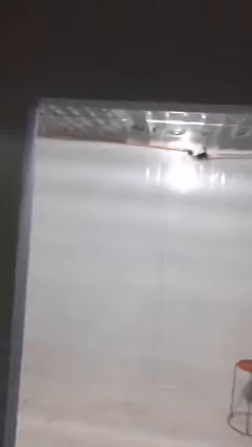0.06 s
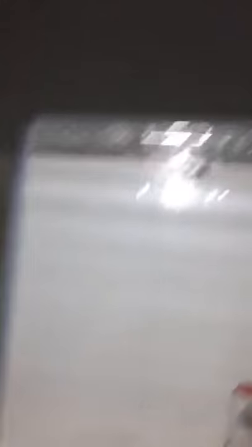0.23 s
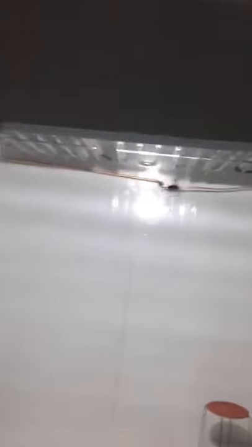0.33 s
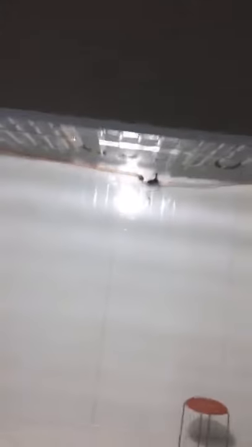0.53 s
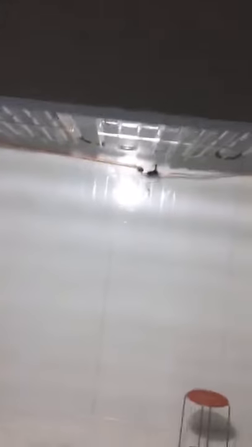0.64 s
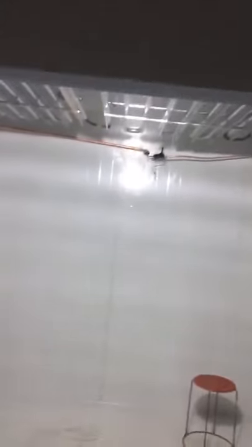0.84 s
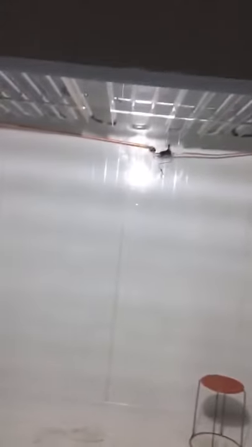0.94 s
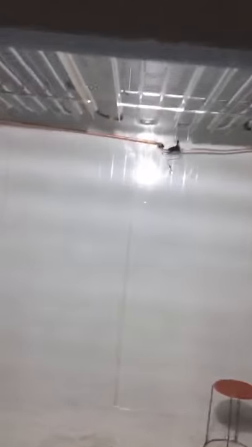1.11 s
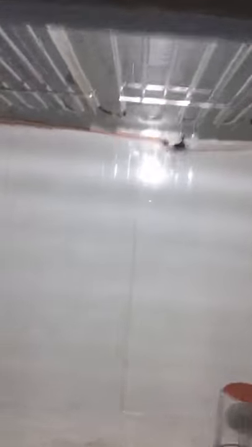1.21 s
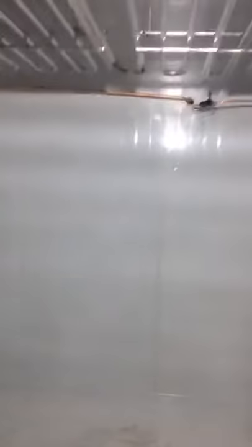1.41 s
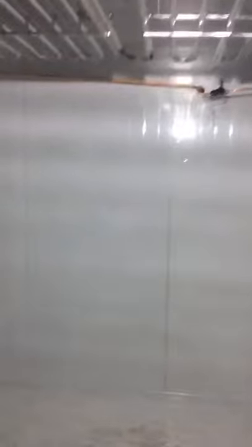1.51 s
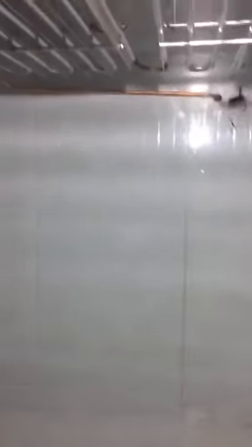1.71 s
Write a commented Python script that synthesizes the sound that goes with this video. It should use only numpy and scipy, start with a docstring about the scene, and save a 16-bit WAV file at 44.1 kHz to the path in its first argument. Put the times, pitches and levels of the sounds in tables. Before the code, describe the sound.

A metal door latch clunks sharply in a bare room, then someone steps inside.

```python
"""Stepping into a cold store

A door's latch scrapes and snaps over in a quick run of metal contacts; the bare room rings with it.
Someone steps inside: light taps, then a hollow heel-and-toe clomp on a floor panel.
Clothes rustle near the microphone over the low drone of distant machinery."""
import sys
import numpy as np
from scipy import signal
from scipy.fft import rfft, irfft, next_fast_len
from scipy.io import wavfile
from scipy.ndimage import map_coordinates

SR = 44100
rng = np.random.default_rng(int(sys.argv[2]) if len(sys.argv) > 2 else 0)


def waveform_to_disk(signal):
    """Save audio, clipped to [-1, 1], as 16-bit WAV at the path in sys.argv[1]."""
    frames = np.transpose(np.atleast_2d(signal))
    scaled = np.clip(frames, -1, 1) * 32767
    samples = np.round(scaled).astype(np.int16)
    wavfile.write(sys.argv[1], SR, samples)


N = 77175

# the bolt's metal contacts: t/s, level/dB, brightness/(dB per octave)
LATCH_CONTACTS = [(.2061, -5.5, -2.5), (.2070, -3.5, -2), (0.2104, -3.5, -2.5), (0.2185, -4, 2),
                  (.2194, -10, 0.5), (0.2203, -.5, -3), (.2230, -2.5, 0), (.2243, -6.5, -3),
                  (0.2272, -15, 1), (0.2298, -7.5, -0.5), (.2320, -12, -2), (.2420, -19, -7.5)]
# tone of the latch's scrape and contacts: f/Hz, level/dB
LATCH_TONE = [(40, -62), (100, -34), (250, -21.5), (600, -18.5), (870, -9.5), (1050, -8), (1300, -11),
              (1600, 0.5), (2000, -3), (2450, -1.5), (3000, -8), (4300, -10.5), (6000, -14), (10000, -19),
              (13000, -15.5)]
# tone of the bolt's hard stop: f/Hz, level/dB
SNAP_TONE = [(500, -13), (3000, -11), (8000, -2.5), (13500, -1)]
# the metal door's ringing notes: f/Hz, level/dB, t60/s (the time to fade by 60 dB)
DOOR_NOTES = [(867, -7.5, 0.28), (1160, -18, 0.089), (1272, -2, .2), (1430, -15, 0.21), (1510, -11.5, 1),
              (1527, 3, 0.23), (1800, 2, 0.063), (1780, -23, 0.1), (1930, 3, 0.11), (2397, 4.5, 0.16),
              (2395, -17, 0.064), (2355, 5.5, .2), (2645, -8, 0.2), (4500, 1, .1)]
# heel and sole landing on the floor panel: t/s, level/dB, brightness/(dB per octave), t60/s
FOOTFALLS = [(1.2715, -29.5, -3, 0.067), (1.280, -30.5, -3, 0.041), (1.2975, -39, 1, 0.12),
             (1.308, -29, -2.5, 0.065), (1.3218, -34, -0.5, 0.032), (1.3245, -28, 1.25, 0.17),
             (1.375, -34.5, 1, 0.064)]
# tone of a footfall: f/Hz, level/dB
STEP_TONE = [(30, -49), (60, -31), (100, -8.5), (150, -9), (195, 2.5), (290, -6.5), (500, -5.5), (780, 3.5),
             (1050, -7), (1300, -7), (2000, -12.5), (2650, -14.5), (3100, -24.5), (3700, -17.5),
             (5000, -27.5), (8000, -30.5), (13000, -47)]
# the floor panel's ringing notes: f/Hz, level/dB, t60/s
PANEL_NOTES = [(180, -7.5, 0.26), (385, -6, 0.45), (602, 0, 0.27), (750, -0.5, 0.15), (852, 4.5, 0.27)]
# light shoe taps: t/s, knock level/dB, knock f/Hz, tick level/dB, tick brightness/(dB per octave), t60/s
SHOE_TAPS = [(.065, -48, 470, -58, -6, 0.2), (0.183, -41, 200, -57, -15, 0.12),
             (0.357, -40, 256, -62, -3, 0.036), (0.677, -43, 1090, -57, -5, 0.039),
             (.978, -44, 454, -41, -2.5, 0.031), (.993, -36, 635, -44, -2.5, 0.056),
             (1.039, -48, 644, -68, 3, 0.071), (1.197, -39.5, 547, -45, 2, 0.049)]
# tone of a tap's dull knock: multiple of the knock's pitch, level/dB
KNOCK_TONE = [(.2, -24.5), (.65, 2), (1, 0.5), (1.7, -6), (4, -23), (20, -43)]
# tone of a tap's dry tick: f/Hz, level/dB
TICK_TONE = [(300, -21), (1500, -4), (2400, -3), (2900, -1), (3600, 8.5), (4600, 4), (5400, -7.5),
             (9000, -7.5), (13000, -8.5)]
# swishes of clothing: peak t/s, half length/s, level/dB
CLOTH_SWISHES = [(0.068, 0.036, -55.5), (0.761, 0.026, -56.5), (0.96, 0.085, -60.5), (1.18, 0.087, -62.5),
                 (1.302, 0.035, -55.5), (1.492, 0.095, -50.5), (1.72, 0.051, -67)]
# tone of rubbing fabric: f/Hz, level/dB
CLOTH_TONE = [(200, -23), (700, -2.5), (2000, -2), (4000, 2), (8000, 1), (13000, -2)]
# tone of the distant machinery: f/Hz, level/dB
DRONE_TONE = [(25, -36), (55, -31), (75, -16.5), (105, -19.5), (132, 2), (185, -1), (300, -9.5), (420, -11),
              (700, -14), (1100, -20), (1500, -16), (2300, -22), (3000, -31), (6000, -29), (13000, -36.5)]
# how long the bare room echoes: f/Hz, t60/s
ROOM_DECAY = [(150, 0.39), (800, 0.72), (1500, 0.91), (2400, 0.89), (4000, 0.93), (8000, 0.58),
              (13000, 0.45)]
# the microphone's weaker bass and treble: f/Hz, level/dB
MIC_TONE = [(20, -7), (55, -3), (90, 1), (12500, -0.5), (13500, -9), (14200, -16)]

SCRAPE_S, SCRAPE_RISE_S, SCRAPE_DB = 0.143, 0.014, -51
CONTACT_GAIN_DB, CONTACT_T60 = 2.5, 0.013
SNAP_S, SNAP_DB, SNAP_T60 = 0.222, -8.5, 0.0041
DOOR_GAIN_DB = -30
PANEL_S, PANEL_RISE_S, PANEL_GAIN_DB = 1.321, 0.003, -33.5
DRONE_DB, DRONE_FALL_DB_PER_S, DRONE_WAVER_DB = -48.5, 1.3, 0.5
HUM_HZ, HUM_DB, HUM_WAVER_DB = 190, -57.5, 3.1
WALL_DELAY_S, DOORWAY_T60, DOORWAY_DB = 0.008, 0.061, -4.5
TOP_HZ = 14200


def latch():
    """The bolt scrapes along its catch, chatters over and snaps to a stop; each part has its own echo."""
    t = clock()
    first_contact_s = LATCH_CONTACTS[0][0]
    sliding = np.clip((t - SCRAPE_S) / SCRAPE_RISE_S, 0, 1) * (t < first_contact_s)
    scrape = amp(SCRAPE_DB) * sliding * noise(LATCH_TONE)
    snap = amp(SNAP_DB) * at(SNAP_S, hit(SNAP_T60, SNAP_TONE))
    parts = [scrape, snap]
    for start, db, tilt in LATCH_CONTACTS:
        blow = 0.94 * unit_energy(burst(CONTACT_T60))
        blow[0] = 0.71  # a sharp click leads the chatter
        contact = through(blow, tone_filter(LATCH_TONE, tilt))
        parts.append(amp(db + CONTACT_GAIN_DB) * at(start, contact))
    return sum(room(part, tail_db=-5.5) for part in parts)


def door():
    """The snap of the bolt rings the metal door."""
    return amp(DOOR_GAIN_DB) * at(SNAP_S, ring(DOOR_NOTES))


def steps():
    """Heel and sole thud on a hollow panel, each with its own echo."""
    thuds = [amp(db) * at(start, hit(t60, STEP_TONE, tilt)) for start, db, tilt, t60 in FOOTFALLS]
    return sum(room(thud, tail_db=-2.5) for thud in thuds)


def floor_panel():
    """The floor panel rings as the full weight settles on it."""
    settling = 1 - np.exp(-clock() / PANEL_RISE_S)
    return amp(PANEL_GAIN_DB) * at(PANEL_S, ring(PANEL_NOTES) * settling)


def taps():
    """Shoes touch down lightly: a dull knock with a dry tick on top."""
    out = np.zeros(N)
    for start, knock_db, hz, tick_db, tilt, t60 in SHOE_TAPS:
        knock_tone = [(hz * multiple, db) for multiple, db in KNOCK_TONE]
        knock = amp(knock_db) * hit(t60, knock_tone)
        tick = amp(tick_db) * hit(t60, TICK_TONE, tilt)
        out += at(start, knock + tick)
    return out


def clothes():
    """Moving fabric hisses in soft swells."""
    t = clock()
    swells = sum(amp(db) * np.exp(-0.5 * ((t - peak) / half) ** 2) for peak, half, db in CLOTH_SWISHES)
    return noise(CLOTH_TONE) * swells


def machinery():
    """A low, wavering drone with one humming note; the drone fades as the microphone moves inside."""
    t = clock()
    hum = np.sin(2 * np.pi * HUM_HZ * t + 0.47 * wobble(per_s=6.4))
    drone_db = DRONE_DB - DRONE_FALL_DB_PER_S * t + DRONE_WAVER_DB * wobble(per_s=9.5)
    drone = amp(drone_db) * noise(DRONE_TONE)
    hum_db = HUM_DB + HUM_WAVER_DB * wobble(per_s=4)
    return drone + amp(hum_db) * hum


def room(x, tail_db):
    """The sound itself, quick echoes from the doorway and a long tail from the bare walls."""
    hz, t, bands = signal.stft(rng.standard_normal(N), SR, nperseg=256)
    decay = amp(-60 * t / along(ROOM_DECAY, hz)[:, None])
    _, tail = signal.istft(bands * decay, SR, nperseg=256)
    walls = amp(tail_db) * at(WALL_DELAY_S, unit_energy(tail))
    scatter = burst(DOORWAY_T60) * rng.standard_normal(N) ** 2
    doorway = amp(DOORWAY_DB) * unit_energy(scatter)
    return x + through(x, walls + doorway)


def hit(t60, tone, tilt_db=0):
    """One impact: a burst of noise with the given tone."""
    return through(burst(t60), tone_filter(tone, tilt_db))


def ring(notes):
    """The fading notes of a struck object; every second one starts by swinging the other way."""
    return sum((-1) ** k * amp(db) * fade(t60) * np.sin(2 * np.pi * hz * clock())
               for k, (hz, db, t60) in enumerate(notes))


def burst(t60):
    """Even-grained white noise that dies away."""
    return np.sign(rng.standard_normal(N)) * fade(t60)


def noise(tone, size=4096):
    """Steady noise with the given tone and an average power of 1."""
    return signal.fftconvolve(rng.standard_normal(N + size - 1), tone_filter(tone), 'valid')


def wobble(per_s):
    """A smooth random wander through per_s new values a second."""
    return map_coordinates(rng.standard_normal(200), [clock() * per_s], mode='mirror')


def tone_filter(tone, tilt_db=0, size=4096):
    """A filter of energy 1 with the given tone, brighter by tilt_db for each octave above 300 Hz."""
    hz = np.fft.rfftfreq(size, 1 / SR)
    db = along(tone, hz) + tilt_db * np.log2(np.maximum(hz, 300))
    # folding the cepstrum packs the energy at the start, so hits stay sharp
    cepstrum = irfft(np.log(amp(db)))
    cepstrum[1:size // 2] *= 2
    cepstrum[size // 2 + 1:] = 0
    return unit_energy(irfft(np.exp(rfft(cepstrum))))


def through(x, response):
    """Pass x through a filter or echo, cut to the scene's length."""
    return signal.fftconvolve(x, response)[:N]


def along(points, hz):
    """Read a table's value at hz, sliding between its rows on a pitch scale."""
    freqs, values = np.transpose(points)
    return np.interp(np.log(hz + 1), np.log(freqs + 1), values)


def at(start, x):
    """Delay x by start seconds."""
    return np.pad(x, (max(round(start * SR), 0), 0))[:N]


def fade(t60):
    """A fall of 60 dB every t60 seconds."""
    return amp(-60 * clock() / t60)


def unit_energy(x):
    """Scale x so that its squares add up to 1."""
    return x / np.linalg.norm(x)


def amp(db):
    """Turn decibels into a multiplier."""
    return 10 ** (np.asarray(db) / 20)


def clock():
    """The time of each sample in seconds."""
    return np.arange(N) / SR


def scene():
    """Door, feet, clothes and machinery together in one channel."""
    metal = latch() + room(door(), tail_db=-11)
    feet = steps() + room(taps(), tail_db=-5) + room(floor_panel(), tail_db=-12)
    return (metal + feet + clothes() + machinery())[None]


def record(dry):
    """The microphone softens deep bass and high treble and keeps nothing above TOP_HZ."""
    size = next_fast_len(N + SR // 2)
    hz = np.fft.rfftfreq(size, 1 / SR)
    response = amp(along(MIC_TONE, hz)) * (hz < TOP_HZ)
    return irfft(rfft(dry, size) * response, size)[..., :N]


dry = scene()
out = record(dry)
waveform_to_disk(out)
```